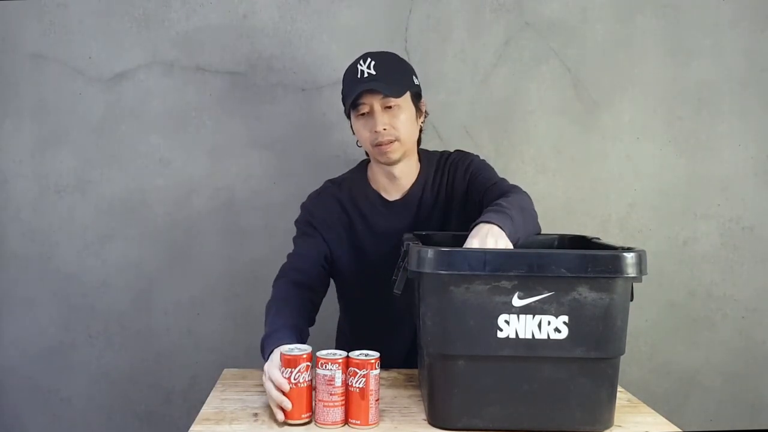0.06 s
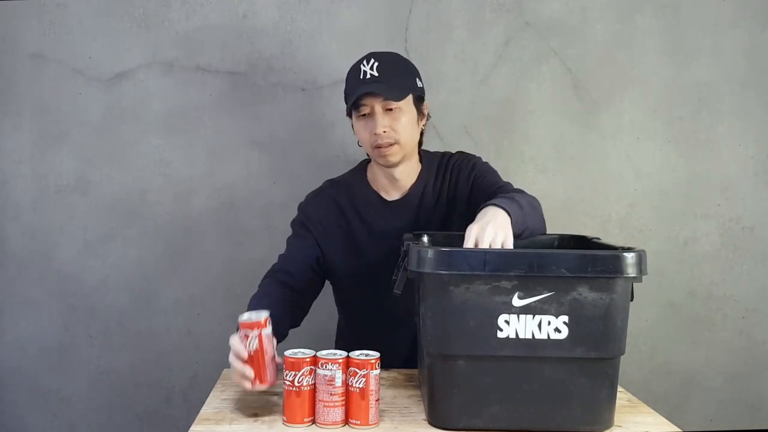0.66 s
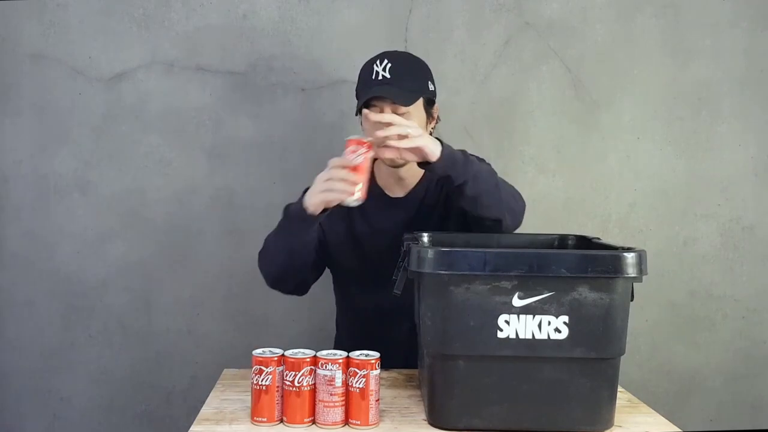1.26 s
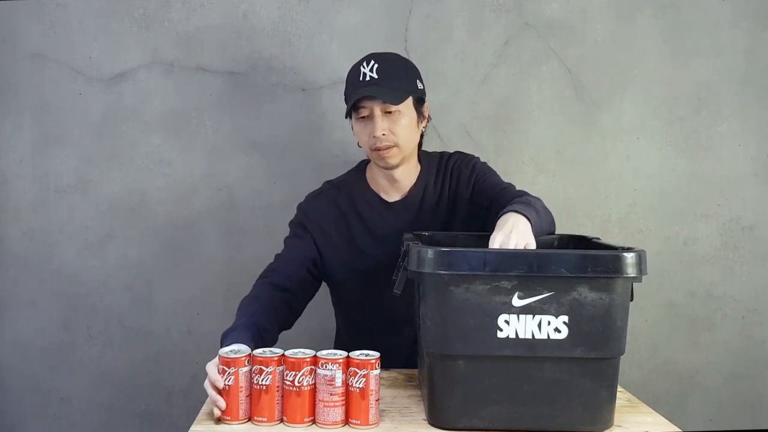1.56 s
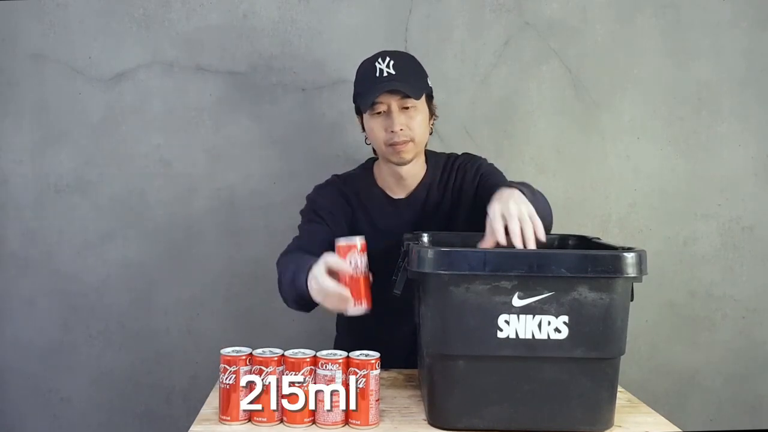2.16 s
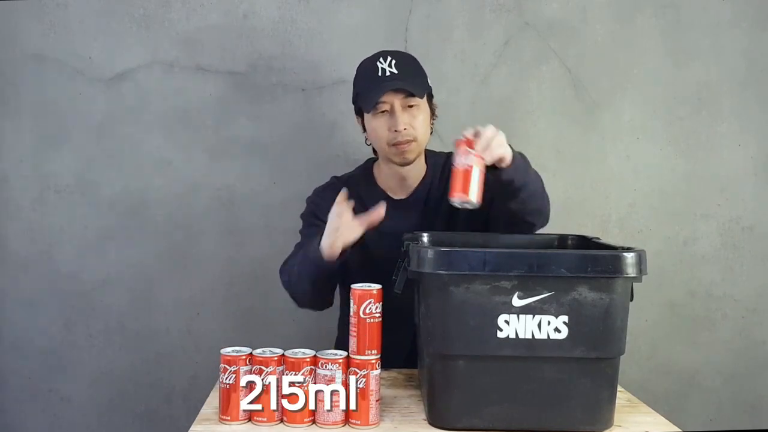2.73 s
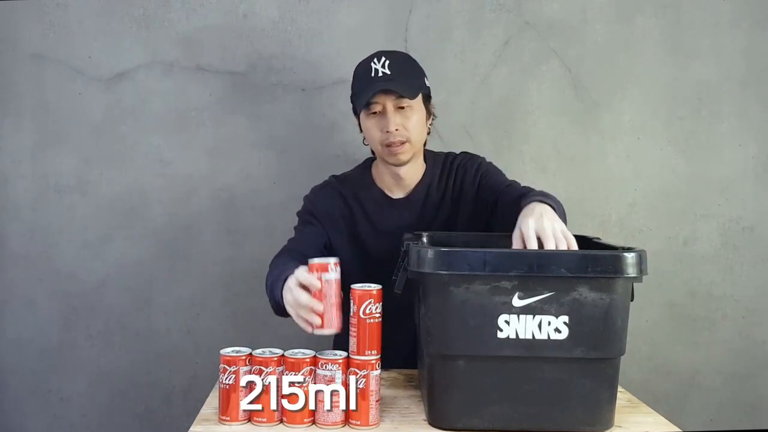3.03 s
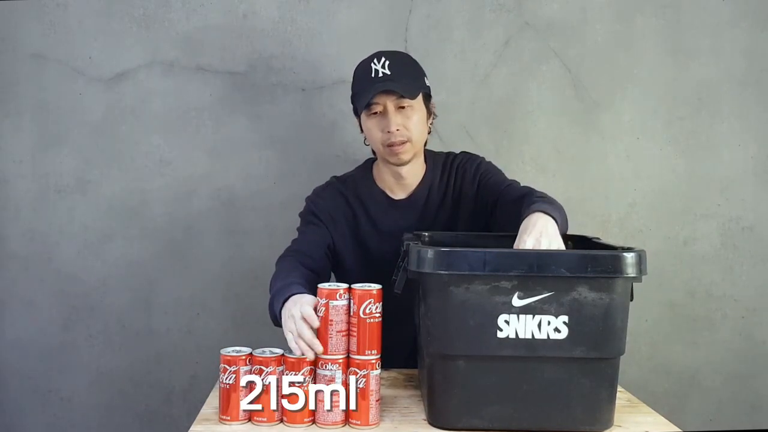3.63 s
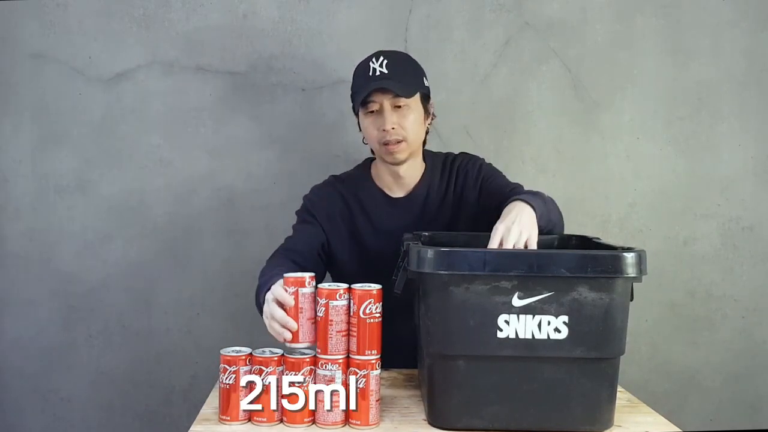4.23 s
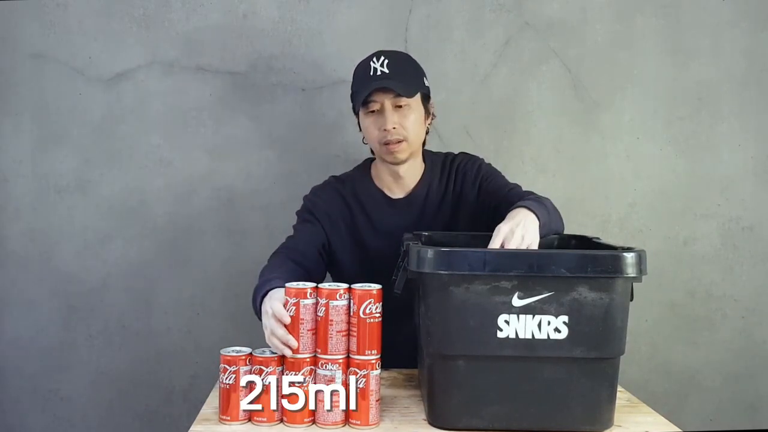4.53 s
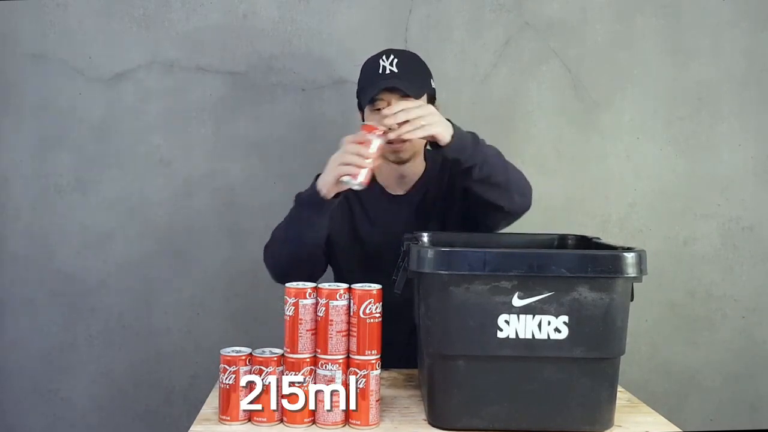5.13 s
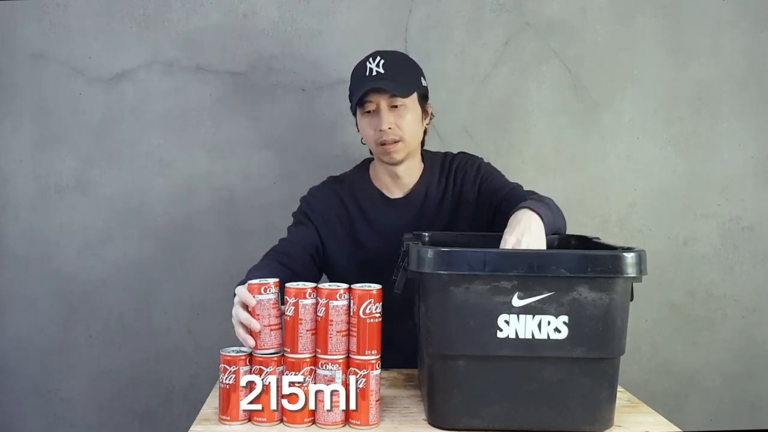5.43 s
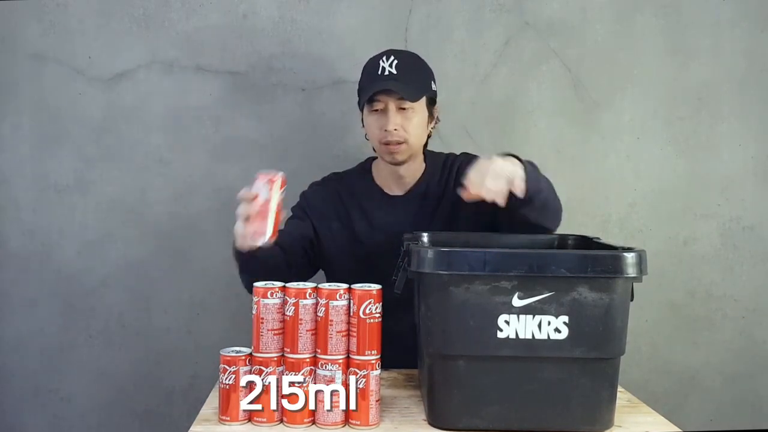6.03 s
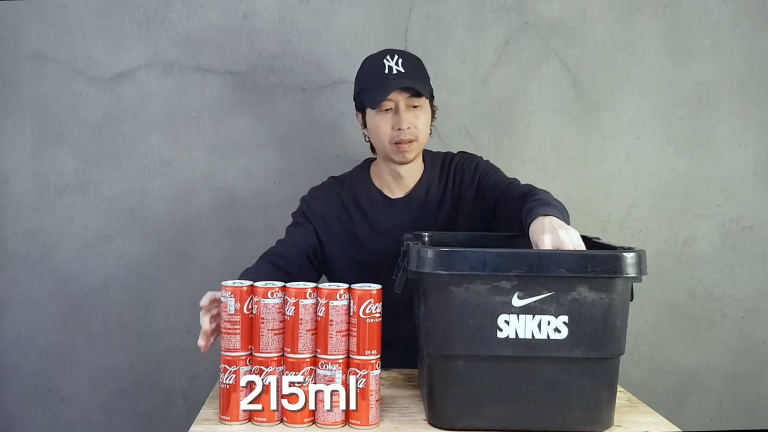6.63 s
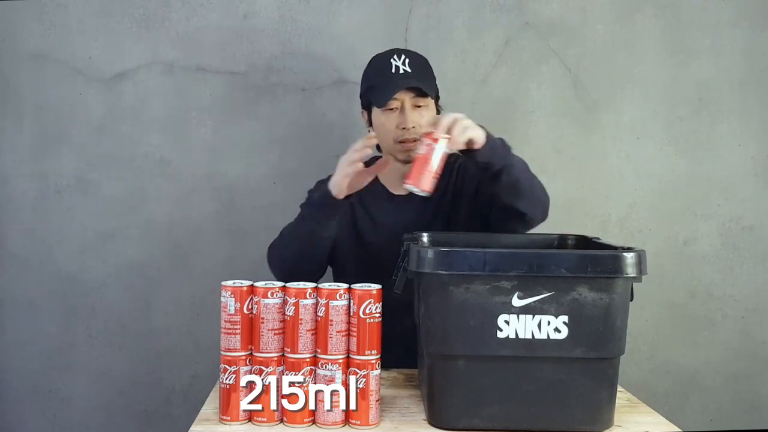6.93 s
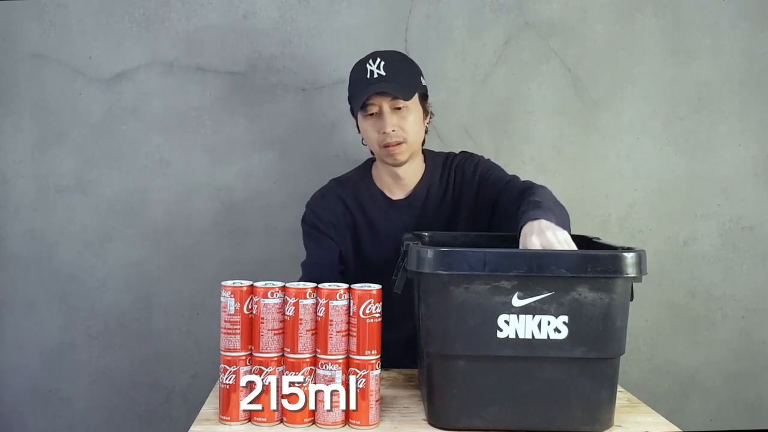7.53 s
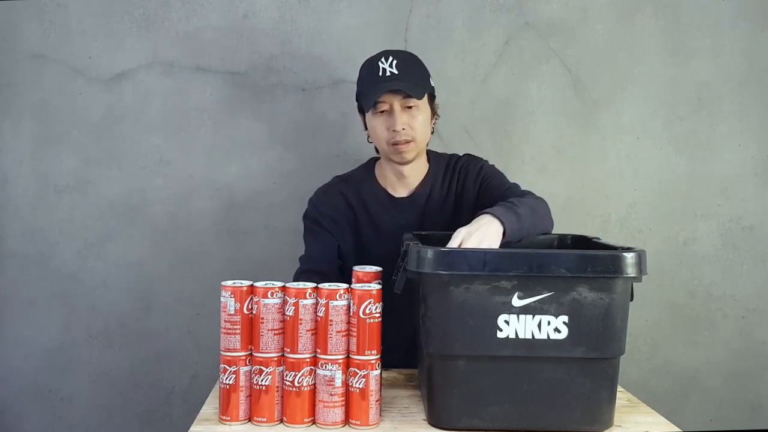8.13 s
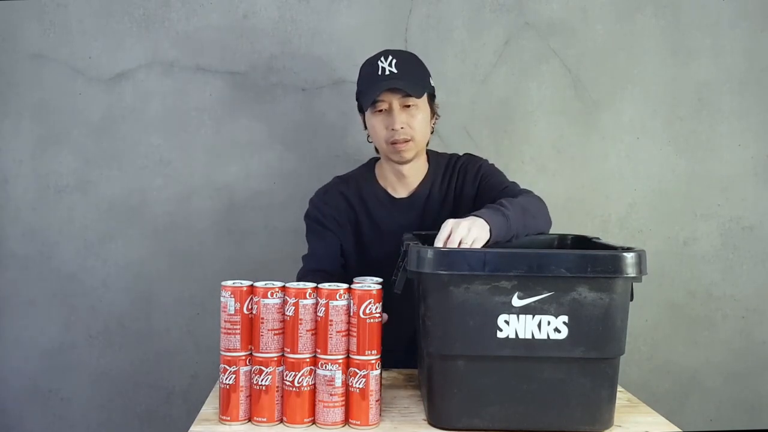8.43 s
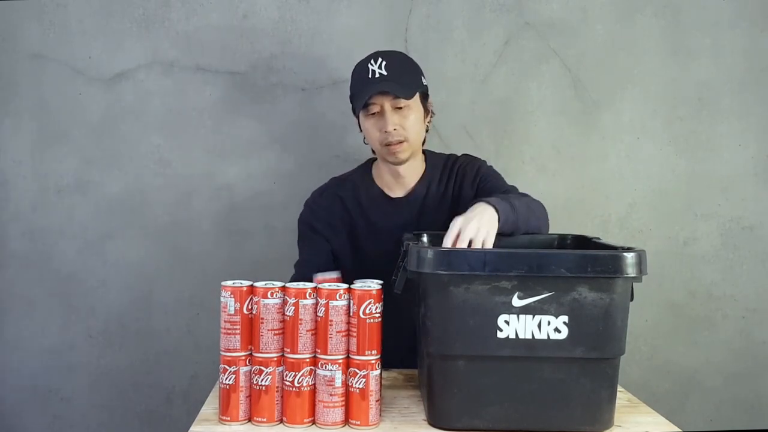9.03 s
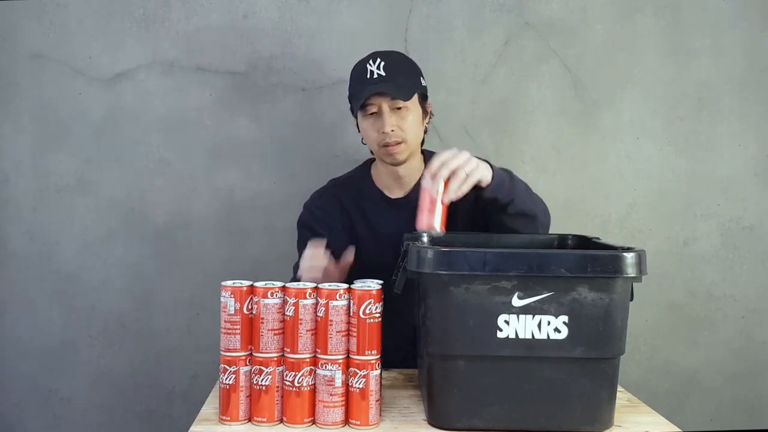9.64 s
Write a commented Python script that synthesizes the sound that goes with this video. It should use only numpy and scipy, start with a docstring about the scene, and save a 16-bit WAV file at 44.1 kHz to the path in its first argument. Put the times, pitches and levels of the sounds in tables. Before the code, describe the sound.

Three hollow knocks of small aluminium cans landing on wood open the scene. Sharper can-on-can clinks follow about once a second, mixed with cans bumping and sliding in a plastic tub and short metallic ringing. Faint finger ticks and sleeve brushes fill the gaps, and two more knocks on wood come late. Everything sits near the centre, over the soft background tone of a small, dry room.

```python
"""A faint hum and a finger tick, then a knock: small aluminium cans are taken from a plastic tub,
set down on a wooden table and stacked. Each impact excites the resonances of wood and can wall;
a can brushes the table, lands and rocks to rest. Jolted cans chime, and hum with beating tones
until a hand damps them. Fingers tick and squeak on the thin metal and a sleeve brushes the tub,
over the quiet tone of a small, dry room. The sound is almost mono."""
import sys
import numpy as np
from scipy import signal
from scipy.fft import rfft, irfft, next_fast_len
from scipy.io import wavfile
from scipy.ndimage import map_coordinates

SR = 44100
rng = np.random.default_rng(int(sys.argv[2]) if len(sys.argv) > 2 else 0)


def store_wav(level_fs):
    """Save 16-bit WAV to argv[1]."""
    pcm = np.round(np.clip(np.atleast_2d(level_fs), -1, 1) * 32767)
    wavfile.write(sys.argv[1], SR, pcm.T.astype(np.int16))


N = 431298
SIZE = 12288  # samples in one short event
T = np.arange(SIZE) / SR
HZ = np.fft.rfftfreq(SIZE, 1 / SR)


# Cans set down: start_s, strength_db, hardness_db, wood_coupling, lead_s, rock_period_s, rock_loss_db
SET_DOWNS = [(0.4795, -16.5, -3, .74, .089, .047, 7), (1.1945, -14, -2, .6, .081, .077, 11.5),
             (1.9395, -12.5, 9, .35, .09, .085, 15), (7.7995, -10, -1, 1.05, .055, .0925, 17),
             (9.755, -12, 1, .2, .004, .09, 15)]
# Spectrum of a can on wood: frequency_hz, level_db
TABLE_SPECTRUM = [(60, -48), (200, -34.5), (300, -20), (450, -14), (620, -10.5), (800, -3.5), (1050, 2),
                  (1400, -3.5), (1750, -13), (2300, -11.5), (3300, -23), (4600, -29), (6000, -40),
                  (16000, -57)]
# Its bands against the knock band: thud_db, clank_db, clink_db, fizz_db
TABLE_BANDS = (-12, -16, -23.5, -42)

def landings(room_db, shell, level_db):
    """Inelastic impact: a can brushes the wood twice, lands, and loses energy with every rock."""
    track = np.zeros((2, N))
    for s, db, hard_db, wood, lead_s, rock_s, loss_db in SET_DOWNS:
        rock_count = 2 if rock_s > .06 else 1
        # start_s, strength_db, slide_ms, hardness_db, weight_db
        brushes = [(s - lead_s * share, db - 24.5, 3.5, 3.5, 0) for share in (1, .43)]
        landing = [(s, db, 0.15, hard_db, 0)]
        rocks = [(s + k * rock_s, db - k ** 1.17 * loss_db, 4, -4.5, 3.5)
                 for k in range(1, rock_count + 1)]
        touches = brushes + landing + rocks
        track += contacts(touches, TABLE_SPECTRUM, TABLE_BANDS, wood, shell, room_db, level_db)
    return track


# Can against can: start_s, strength_db, slide_ms, hardness_db, weight_db
STACK_HITS = [(2.5945, -33, 4.6, 1, -16), (2.619, -13.5, 0.82, -1.5, -3.5), (2.684, -26, .9, 4.5, 3.5),
              (2.694, -19, 0.87, -0.5, -6), (2.7395, -32, 0.82, 5.5, 3.5), (2.849, -34.5, 16, 1, -5),
              (3.4925, -17, 0.97, 2.5, -5), (3.568, -26, 4.8, 0, -1.5), (3.741, -38, 3.9, 4.5, 2),
              (3.815, -38, 20.4, 0, 2), (4.062, -50, 5.6, -4.5, 8), (4.6618, -29, 1.8, 6.5, -5),
              (4.679, -21, 1.8, -4, -0.5), (5.7535, -9.5, 5.1, -3, -3.5), (5.7635, -27, 1.3, 8.5, -3),
              (5.815, -31.5, 5.5, 0.5, 5), (5.8372, -31.5, 1.9, 5.5, -3), (5.849, -22, 7.5, -3, 6.5),
              (6.695, -20, 1.5, 1, -1), (6.7785, -33.5, 8.1, 0.5, 1), (8.5985, -15, 0.9, -1, 3.5),
              (8.641, -24, 2.3, 2.5, 5), (8.9515, -37, 8.1, 11, 12)]
# Spectrum of a can on a can: frequency_hz, level_db
STACK_SPECTRUM = [(35, -86), (60, -40), (180, -22.5), (408, -6.5), (903, 7.5), (1340, 0.5), (1510, -4),
                  (1950, -14), (2970, -28), (3420, -19.5), (4640, -17), (5720, 0.5), (9130, -35),
                  (13900, -41.5), (16000, -62)]
# Its bands against the knock band: thud_db, clank_db, clink_db, fizz_db
STACK_BANDS = (-12.5, -12.5, -10.5, -24)

def stacking():
    """Hard contact: metal on metal excites the high shell modes and clinks."""
    return contacts(STACK_HITS, STACK_SPECTRUM, STACK_BANDS,
                    wood=0.83, shell=0.83, room_db=-2, level_db=0)


# Cans jostled in the tub, and further dull knocks of the same colour: start_s, strength_db, slide_ms,
# hardness_db, weight_db
DULL_HITS = [(2.906, -27.5, 5.1, 2, 4), (2.9155, -13.5, 4.4, -2, -9), (3.8572, -14, 2.1, -2, -4.5),
             (4.884, -39, 12, 1.5, 7.5), (4.95, -24.5, 3.8, 11.5, -1), (4.961, -15.5, 0.29, 1.5, 4),
             (4.976, -36, 5.9, 15, -23), (4.996, -25, 7.7, 2, -3), (5.041, -33, 3.4, -3.5, 2),
             (5.132, -23.5, 4, 3, -10.5), (6.009, -44.5, 3.5, -4, -15), (6.548, -43.5, 4.3, -4, 2),
             (6.613, -34.5, 3.7, -2, 7.5), (6.632, -29.5, 7.4, -3, 1), (6.833, -24.5, 6.7, -5, -4),
             (6.844, -25, 2.5, 0.5, 0), (7.013, -42.5, 4.8, 9, 0), (7.086, -31, 7.8, 0, -4),
             (7.174, -33, 22.5, 1.5, 3), (7.247, -25, 8, -2.5, 2.5), (7.259, -18, 5.5, 4, 4),
             (7.282, -24, 7.9, 4.5, 3), (7.585, -36.5, 3.7, 1, -12), (8.005, -41, 1.1, -4, 8.5),
             (8.732, -32.5, 7.4, -7.5, 2), (8.8015, -26.5, 0.32, 1, -1), (8.83, -23.5, 7.2, -13, 2.5),
             (8.8875, -15, 6.6, -6.5, 3.5), (9.051, -24.5, 1.36, 0, -3)]
# Spectrum of a can in the tub: frequency_hz, level_db
TUB_SPECTRUM = [(35, -75), (60, -47), (184, -31), (579, -3.5), (1250, 4), (1780, -12), (2050, -18.5),
                (2900, -21.5), (3420, -18.5), (4120, -23), (5460, -14), (7060, -19.5), (9130, -32.5),
                (13300, -41.5), (16000, -52)]
# Its bands against the knock band: thud_db, clank_db, clink_db, fizz_db
TUB_BANDS = (-9, -11, -16, -21.5)

def jostling():
    """Glancing impact: cans knock and slide in the plastic tub, with further dull knocks of the same colour."""
    return contacts(DULL_HITS, TUB_SPECTRUM, TUB_BANDS, wood=0.77, shell=0.93, room_db=4, level_db=-0.5)


# Resonances of the table top: centre_hz, width_hz, lift_db
WOOD_MODES = [(308, 36, 13), (448.6, 62, 17), (609, 130, 7), (732, 112, 12), (795, 28, 5.5), (894, 29, 7.5),
              (990, 39, 4), (1080, 32, -2), (1760, 190, 7.5)]
# Resonances of a can's wall and lid: centre_hz, width_hz, lift_db
SHELL_MODES = [(2500, 127, 0), (3315, 240, 0.5), (3516, 170, 13.5), (4500, 330, 2), (5567, 440, 7),
               (5920, 160, 5.5), (6700, 580, 11), (8390, 220, 7), (11500, 700, 0.5)]
# Limits of the thud, knock, clank, clink and fizz bands: edge_hz
EDGES_HZ = [200, 600, 1800, 4500, 8000, 16000]

def contacts(touches, spectrum, balance, wood, shell, room_db, level_db):
    """Source and filter: a touch drives wood and shell modes; heavy ones thud, hard ones are bright."""
    track = np.zeros((2, N))
    body = minimum_phase(along(spectrum, HZ) + shell * lifts(SHELL_MODES) + wood * lifts(WOOD_MODES))
    bands = list(zip(EDGES_HZ, EDGES_HZ[1:]))
    centres_hz = np.sqrt(np.prod(bands, axis=1))
    thud, clank, clink, fizz = balance
    for s, db, slide_ms, hard_db, weight_db in touches:
        band_db = db + np.array([thud + weight_db, 0, clank + hard_db,
                                 clink + hard_db, fizz + 1.46 * hard_db])
        hit = contact_pulse(slide_ms, room_db) * body
        for _ in range(2):  # bring each band to its strength
            energy = np.array([np.sum(abs(hit[0, (HZ >= lo) & (HZ < hi)]) ** 2) for lo, hi in bands])
            power = energy * 2 / SIZE / (SR / 100)  # spread over 10 ms
            gain_db = band_db - 10 * np.log10(power)
            hit = hit * minimum_phase(along(np.c_[centres_hz, gain_db], HZ))
        add(track, s, irfft(hit))
    return amp(level_db) * track


# Stereo width of the reflections: frequency_hz, side_gain_db
REFLECTION_WIDTH = [(200, -28), (800, -84), (2000, -24), (4000, -12), (8000, -7), (14000, -3)]

def contact_pulse(slide_ms, room_db, scrape_per_ms=0.47):
    """Impulse and friction: a push, tiny slips and their reflections, as mid and side spectra."""
    decay_s = max(slide_ms, .05) / 1000
    slips = rng.standard_normal(SIZE) * rng.exponential(size=SIZE) ** 2
    slips *= np.sqrt(T) * np.exp(-T / decay_s)
    force = scrape_per_ms * slide_ms * slips / np.linalg.norm(slips)
    force[0] += 1
    mid, side = amp(room_db) * rfft(room_tails())
    return rfft(force) * np.array([1 + mid, side * amp(along(REFLECTION_WIDTH, HZ))])


# Jolted cans: start_s, middle_pitch_hz, low_level_db, middle_level_db, middle_t60_s, free_s
HUMS = [(0.0, 1372, -42, -45, 0.56, 0.01), (.48, 1340, -55, -49, 1.65, .5),
        (1.941, 1333, -64, -39, 0.68, 0.13), (2.62, 1355, -33, -32.5, .9, 0.04),
        (2.694, 1362, -26.5, -32.5, 0.69, 0.15), (2.915, 1362, -40, -41, 2.6, .57),
        (3.494, 1373, -31.5, -30, 1.6, .13), (3.856, 1373, -38.5, -41, 0.96, .5),
        (4.664, 1354, -48, -32.5, 0.87, .33), (4.959, 1370, -41, -32.5, 0.68, .32),
        (5.755, 1374, -32.5, -29, 1.2, .32), (5.849, 1362, -36, -38.5, 0.99, .25),
        (6.695, 1372, -32, -35.5, .9, 0.093), (6.844, 1368, -44, -32.5, 0.87, 0.11),
        (7.26, 1365, -30, -30.5, 0.71, 0.066), (7.8, 1360, -51, -38.5, 0.77, .45),
        (8.599, 1376, -32, -34, 0.63, 0.17), (8.952, 1370, -36.5, -52, 0.87, .6)]
SWELL_S = 0.0065  # rise of a hum or chime

def hums(level_db, low_hz=1285, grip_db=13.5, grip_s=0.09):
    """Beating: two close modes of a jolted can ring freely until a hand damps them."""
    track, t = np.zeros(N + 2 * SR), np.arange(2 * SR) / SR
    for s, middle_hz, low_db, middle_db, t60, free_s in HUMS:
        grip = amp(-grip_db * np.clip((t - free_s) / grip_s, 0, 1))
        hum = mode(t, low_hz, low_db, t60=1) + mode(t, middle_hz, middle_db, t60)
        track[round(s * SR):][:len(t)] += hum * grip * (1 - np.exp(-t / SWELL_S))
    return amp(level_db) * track[:N]


# Struck cans that sing: start_s, level_db
CHIME_STRIKES = [(.53, -51), (2.694, -52), (2.916, -51), (3.493, -60), (3.857, -49), (4.662, -52),
                 (4.96, -50), (5.131, -53), (5.83, -53), (6.695, -54), (7.013, -51), (7.261, -43),
                 (7.8, -57), (8.6, -55)]
# Partials around the chime's main tone: pitch_hz, relative_db, t60_s
PARTIALS = [(1520, -13, 0.21), (1700, -15, 0.31), (2470, -9, 0.15), (2600, -7.5, 0.7), (3280, -11, 0.38),
            (3260, -10, 0.27), (5400, 0, 0.12), (6860, 1, 0.089)]

def chimes(level_db, pitch_hz=1916):
    """Inharmonic shell modes: a high tone outlasts its partials, all a little different each strike."""
    track, t = np.zeros(N + SR), np.arange(SR) / SR
    for s, db in CHIME_STRIKES:
        ring = mode(t, pitch_hz * (1 + rng.normal(0, 0.00397)), db, t60=1)
        for hz, relative_db, t60 in PARTIALS:
            detuned_hz = hz * (1 + rng.normal(0, 0.007))
            ring += mode(t, detuned_hz, db + relative_db + rng.normal(0, 3), t60)
        track[round(s * SR):][:len(t)] += ring * (1 - np.exp(-t / SWELL_S))
    return amp(level_db) * track[:N]


# Fingertips on the cans: start_s, relative_peak_db, centre_hz
TICKS = [(0.0995, -39.5, 3210), (.82, -42, 8800), (.965, -43, 8500), (1.5728, -42.5, 7300),
         (2.8539, -38, 5910), (1.6323, -33.5, 2340), (1.6645, -37, 2360), (2.354, -42.5, 4250),
         (3.1943, -33, 5270), (3.2124, -25, 2750), (3.2996, -28.5, 4200), (4.2842, -38.5, 4570),
         (4.333, -35.5, 10360), (4.4231, -21.5, 12600), (4.8713, -27, 6660), (5.4331, -32.5, 7100),
         (5.474, -33, 3880), (6.127, -38, 8450), (6.2588, -32.5, 4370), (6.3155, -34, 1990),
         (6.996, -34, 5590), (8.3783, -31.5, 7500), (9.3184, -34, 3480), (9.6646, -34.5, 5170)]
# Spectrum of a tick: frequency_hz, level_db
TICK_SPECTRUM = [(60, -32), (300, -10), (1200, -11.5), (3000, -5), (6000, -3.5), (11000, -5.5),
                 (16000, -17)]

def finger_ticks(slide_ms, room_db, lift_db, level_db, faint_db, faint_count):
    """Light impact: fingertips touch and peel off thin metal in bright clicks, fainter ones between."""
    track = np.zeros((2, N))
    faint = [(when * N / SR, faint_db + 7 * size, 3000 * 4 ** pitch)
             for when, size, pitch in rng.random((faint_count, 3))]
    for s, db, centre_hz in list(TICKS) + faint:
        spectrum_db = along(TICK_SPECTRUM, HZ) + lifts([(centre_hz, centre_hz * 0.23, lift_db)])
        tick = irfft(contact_pulse(slide_ms, room_db) * minimum_phase(spectrum_db))
        add(track, s, amp(db + level_db) * tick / abs(tick[0]).max())
    return track


# A damp finger on metal: start_s, length_s, start_hz, end_hz, level_db
SQUEAK_GLIDES = [(6.258, .014, 5000, 4500, -42), (6.319, .04, 1750, 3100, -48)]

def squeaks(jitter=.2):
    """Stick-slip friction: a finger draws short, rough, gliding whistles from the metal."""
    track = np.zeros(N)
    for s, length_s, start_hz, end_hz, db in SQUEAK_GLIDES:
        progress = np.minimum(T / length_s, 1)
        hz = (start_hz + (end_hz - start_hz) * progress) * (1 + jitter * rng.standard_normal(SIZE))
        envelope = np.sqrt(abs(np.sin(np.pi * progress)))
        add(track, s, amp(db) * envelope * np.sin(2 * np.pi * np.cumsum(hz) / SR))
    return track


# Cloth on the tub: start_s, length_s, level_db
SLEEVE_STROKES = [(0.714, 0.26, -59.5), (3.131, 0.22, -59.5), (3.652, 0.18, -60.5), (4.261, 0.26, -63),
                  (8.22, 0.11, -57.5), (8.982, 0.069, -54)]

def sleeve(level_db, side_share, centre_hz=3170):
    """Friction noise: cloth brushes the tub in soft swells of narrow hiss as the arm reaches in."""
    track = np.zeros((2, N))
    band = 1 / (1 + ((HZ - centre_hz) / (0.3 * centre_hz)) ** 2)
    for s, length_s, db in SLEEVE_STROKES:
        hiss = irfft(rfft(rng.standard_normal((2, SIZE))) * band)
        stroke = np.sin(np.pi * np.minimum(T / length_s, 1))
        add(track, s, amp(db + level_db) * stroke * hiss / hiss.std() * [[1], [side_share]])
    return track


# Spectrum of slipping cans: frequency_hz, level_db
SHUFFLE_SPECTRUM = [(300, -24), (1500, -13), (3500, -3), (6500, -8.5), (10000, -13.5), (16000, -15)]

def shuffle(hits, level_db, span_s, follow_power, grips_per_s=25, wander_db=4.16):
    """Micro-slip: around the impacts, cans rub on hands and each other, exciting their shell modes."""
    activity = abs(signal.fftconvolve(hits ** 2, signal.windows.hann(int(span_s * SR)), "same"))
    grips = rng.standard_normal(int(N * grips_per_s / SR) + 4)
    wander = map_coordinates(grips, [np.arange(N) * grips_per_s / SR])
    slips = rng.standard_normal(N) * rng.exponential(size=N)
    wall_response = irfft(minimum_phase(along(SHUFFLE_SPECTRUM, HZ) + lifts(SHELL_MODES)))
    grains = signal.fftconvolve(slips, wall_response)[:N]
    envelope = amp(level_db + wander_db * wander) * (activity / activity.max()) ** follow_power
    return envelope * grains / grains.std()


# Decay of the room: frequency_hz, t60_s
ROOM_DECAY = [(150, 0.091), (500, 0.087), (1400, 0.097), (3600, 0.086), (6500, 0.057), (14000, 0.09)]

def room_tails(rise_s=0.0004):
    """Diffuse reflection: two uncorrelated tails of unit energy, dying fastest near 6.5 kHz."""
    hz, t, noise = signal.stft(rng.standard_normal((2, SIZE)), SR, nperseg=128)
    decay = amp(-60 * t / along(ROOM_DECAY, hz)[:, None])
    tails = signal.istft(noise * decay, SR)[1][:, :SIZE] * (1 - np.exp(-T / rise_s))
    return tails / np.linalg.norm(tails, axis=1, keepdims=True)


def late_ring(hits, t60, level_db, cutoff_hz=3500):
    """Reverberation: the tub and far walls add a faint, longer tail with softened treble."""
    t = np.arange(SR) / SR
    tail = rng.standard_normal(SR) * amp(-60 * t / t60)
    lowpass = signal.butter(1, cutoff_hz, fs=SR, output="sos")
    tail = signal.sosfilt(lowpass, tail / np.linalg.norm(tail))
    return amp(level_db) * signal.fftconvolve(hits, tail)[:N]


# Spectrum of the room tone: frequency_hz, level_db
AMBIENT_SPECTRUM = [(12, -42), (20, -22), (216, -5), (337, -1.5), (422, -2), (527, -0.5), (590, 0.5),
                    (949, -1), (1220, -3), (1330, -2), (2530, -11), (4540, -16.5), (5680, -18.5),
                    (11800, -24), (16000, -27)]
# Its stereo width: frequency_hz, side_against_mid_db
AMBIENT_WIDTH = [(60, -18), (180, -16.5), (550, -16.5), (1650, -15), (4970, 0), (15000, 1)]

def room_tone(level_db):
    """Stationary noise: a steady background as mid and side, widest in the treble."""
    hz = np.fft.rfftfreq(N, 1 / SR)
    noise = rfft(rng.standard_normal((2, N))) * amp(along(AMBIENT_SPECTRUM, hz))
    noise[1] *= amp(along(AMBIENT_WIDTH, hz))
    pair = irfft(noise, N)
    return amp(level_db) * pair / pair[0].std()


def mode(t, hz, db, t60):
    """Damped oscillation: one decaying sine of random phase."""
    return amp(db - 60 * t / t60) * np.sin(2 * np.pi * (hz * t + rng.random()))


def lifts(resonances):
    """Resonance: the summed bell-shaped peaks, in dB."""
    return sum(db / (1 + (2 * (HZ - hz) / width) ** 2) for hz, width, db in resonances)


def minimum_phase(db):
    """Causality: the most prompt response that has these levels."""
    cepstrum = irfft(np.log(np.maximum(amp(db), 1e-6)))
    cepstrum[1:SIZE // 2] *= 2
    cepstrum[SIZE // 2 + 1:] = 0
    return np.exp(rfft(cepstrum))


def along(points, hz):
    """Interpolation of (frequency_hz, value) points on a log axis."""
    point_hz, values = np.transpose(points)
    return np.interp(np.log(hz + 1), np.log(point_hz + 1), values)


def amp(db):
    """Decibels to amplitude ratio."""
    return 10 ** (np.asarray(db) / 20)


def add(track, start_s, sound):
    """Superposition: mix a short event into the track."""
    start = max(round(start_s * SR), 0)
    part = track[..., start:start + SIZE]
    part += sound[..., :part.shape[-1]]


def scene():
    """Mid-side stereo: all sources sum to left and right; the impacts' treble leans slightly right."""
    hits = landings(room_db=3.5, shell=0.57, level_db=0.5) + stacking() + jostling()
    hits += finger_ticks(slide_ms=2.17, room_db=-1, lift_db=12, level_db=1.5,
                         faint_db=-45.5, faint_count=36)
    mid, side = hits + sleeve(level_db=-1, side_share=0.2)
    room_mid, room_side = room_tone(level_db=-57.5)
    mid += hums(level_db=1.5) + chimes(level_db=-1)
    mid += shuffle(hits[0], level_db=-62.5, span_s=0.38, follow_power=0.29)
    mid += room_mid + late_ring(hits[0], t60=0.58, level_db=-27.5) + squeaks()
    treble = signal.sosfilt(signal.butter(1, 3500, "high", fs=SR, output="sos"), hits[0])
    side += room_side - .1 * treble
    return np.array([mid + side, mid - side])


def record(dry):
    """Clipping and band limiting: peaks stop at full scale, then all above 16.3 kHz is removed."""
    size = next_fast_len(N + SIZE)
    passband = np.fft.rfftfreq(size, 1 / SR) < 16300
    return irfft(rfft(np.clip(dry, -1, 1), size) * passband, size)[:, :N]


dry = scene()
out = record(dry)
store_wav(out)
```